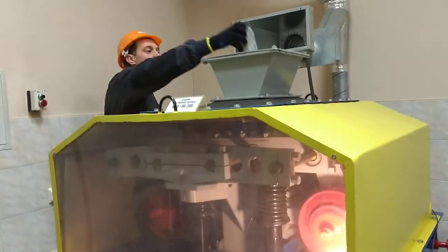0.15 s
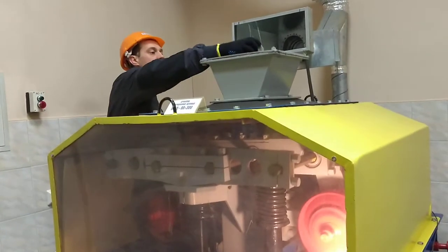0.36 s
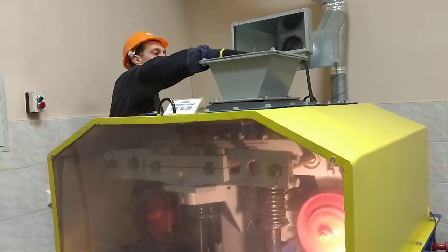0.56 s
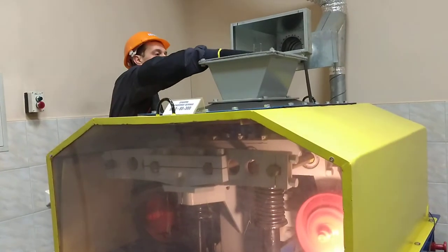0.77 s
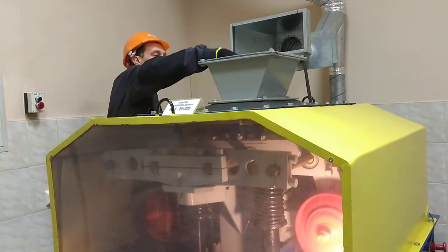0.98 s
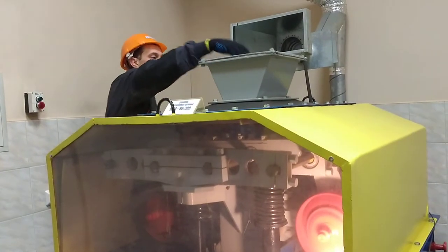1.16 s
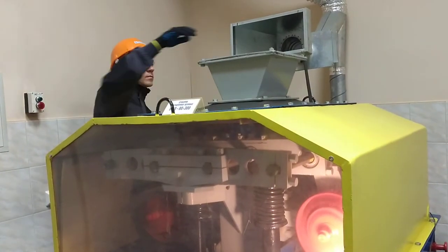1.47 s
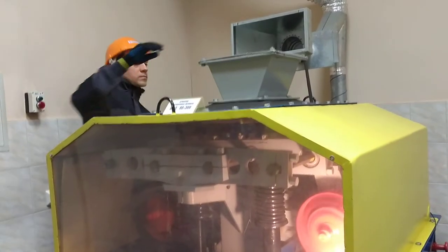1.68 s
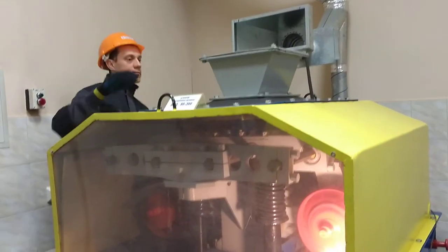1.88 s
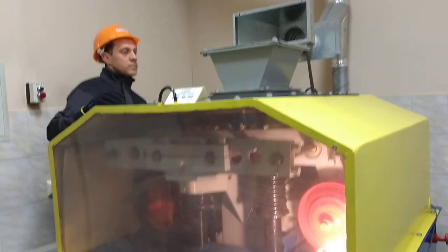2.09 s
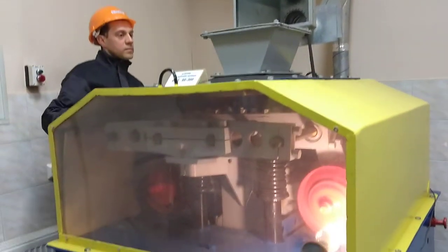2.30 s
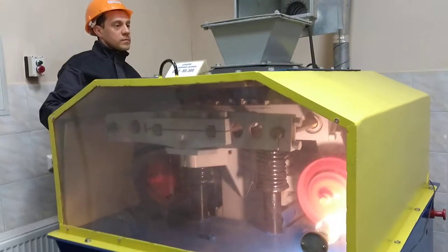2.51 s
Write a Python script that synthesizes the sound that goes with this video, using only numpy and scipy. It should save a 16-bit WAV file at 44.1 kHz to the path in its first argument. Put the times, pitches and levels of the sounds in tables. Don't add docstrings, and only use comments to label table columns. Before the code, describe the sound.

A jaw crusher runs loudly throughout, a deep shuddering roar with rattling steel casing, tonal hum and airy fan hiss. Around 1.1-1.3 s a stone clatters down the hollow metal hopper with quick knocks, thuds and a gritty scrape; the microphone level dips, then recovers. From 1.75 s jaws crunch, sharpest cracks until 2.05 s, with rumble heaving at 1.8 and 2.4 s. Short tiled-room echo, wide stereo.

```python
import sys
import numpy as np
from scipy import signal
from scipy.fft import rfft, irfft, next_fast_len
from scipy.io import wavfile
from scipy.ndimage import uniform_filter1d, map_coordinates

SR = 44100
rng = np.random.default_rng(int(sys.argv[2]) if len(sys.argv) > 2 else 0)


def persist_wave(psi):
    counts = np.round(np.clip(psi, -1, 1) * 32767).astype(np.int16)
    wavfile.write(sys.argv[1], SR, np.atleast_2d(counts).T)


def amplitude_ratio(level_db):
    exponent = np.asarray(level_db, float) / 20
    return 10 ** exponent


N = 116865
TIME_S = np.arange(N) / SR
HALVES = np.array([[.5], [-.5]])


def unit(x):
    return x / np.sqrt(np.mean(x ** 2) + 1e-20)


def along(points, hz):
    f, v = np.transpose(points)
    return np.interp(np.log(hz + 1), np.log(f + 1), v)


def curve(rows):
    return np.interp(TIME_S, *np.transpose(rows))


def wobble(rate):
    knots = rng.standard_normal(int(N * rate / SR) + 4)
    return map_coordinates(knots, [np.arange(N) * rate / SR])


def filtered(x, response):
    m = next_fast_len(N + SR // 2)
    return irfft(rfft(x, m) * response(np.fft.rfftfreq(m, 1 / SR)), m)[..., :N]


def resonances(table):
    def response(f):
        total = 0
        for k, (c, w, db) in enumerate(table):
            total = total + (-1) ** k * amplitude_ratio(db) * 1j * f * w / (c * c - f * f + 1j * f * w)
        return total
    return response


def noise(patchy_db):
    z = signal.stft(rng.standard_normal((2, N)), nperseg=512)[2]
    field = uniform_filter1d(rng.standard_normal(z.shape[1:]), 6, 0)
    field = uniform_filter1d(field, 10, 1)
    patchy = signal.istft(z * amplitude_ratio(patchy_db * unit(field)), nperseg=512)[1][:, :N]
    return unit(patchy) * np.sqrt(SR / 2)


def clicks(per_s, scatter_db):
    hits = rng.random((2, N)) < per_s / SR
    size = amplitude_ratio(scatter_db * rng.exponential(size=(2, N)))
    return unit(hits * size * rng.choice([-1, 1], (2, N)))


SHAFT_HZ = 24.9
WEAK_ORDERS_DB, WEAK_SCATTER_DB = 8.5, 6
UNSTEADY_DB, SPREAD_RAD = 1.65, 1.9
LOAD_DAMPS_DB, DAMPED_FROM_HZ = 14, 500
HUM_ORDER, HUM_HZ, HUM_DB, HUM_IN_STEP_S = 12, 300, -33, .17
# multiple, level_db, left_over_right_db, left_leads_rad
STRONG_ORDERS = [(2, -37.9, 0.2, 0.09), (3, -19.9, 0.3, -0.01), (4, -36.5, 0.6, 0.04),
                 (7, -39.5, -0.8, 0.09), (8, -40.8, 2.0, -0.01), (10, -39.9, -0.2, -0.13),
                 (12, -29.4, -1.5, 0.27), (13, -35.9, 0.5, 0.2), (14, -32.6, -1.0, 0.16),
                 (15, -36.2, -0.2, -0.05), (16, -32.1, -3.0, 0.52), (19, -34.2, -3.7, 0.68),
                 (20, -38.1, -2.1, 0.76), (21, -41.9, -1.5, 0.22), (22, -37, -1, 0.2),
                 (25, -40.6, -2.0, 0.39), (27, -37.5, 1.6, 0.31), (28, -27.9, 0.5, 0.36),
                 (29, -35.5, -1.7, 0.01), (32, -33.2, 0.4, 0.12), (33, -43.0, -10.5, 1.34),
                 (34, -43.5, -13.5, -2.07), (35, -44.8, -6.1, -0.07), (37, -44.8, -2.6, -0.13),
                 (39, -49.0, 2.1, 0.25), (43, -46.4, 8.1, -1.06), (49, -36.4, 3.3, -2.57),
                 (51, -40.9, -5.6, 2.12), (55, -43.7, 9.4, 1.58), (70, -36.4, 3.1, 1.67),
                 (73, -43.0, 7.2, 3.04), (140, -52, 0, 0)]
# pitch_hz, level_db_per_hz
ROAR_SHARED = [(35, -60), (90, -57), (200, -55.5), (450, -54), (750, -59), (1100, -71), (2000, -67.5),
               (4000, -76)]
# time_s, load_share
LOAD = [
    (0, 0.024),
    (1.15, 0.063),
    (1.3, 0.066),
    (1.7, 0.27),
    (1.8, 0.65),
    (1.97, 1.1),
    (2.1, 0.69),
    (2.4, 0.95),
    (2.65, 0.61),
]


def shafts():
    strong = {int(k): rest for k, *rest in STRONG_ORDERS}
    turn = 2 * np.pi * SHAFT_HZ * TIME_S
    load = np.clip(2 * curve(LOAD), 0, 1)
    out = np.zeros((2, N))
    for k, (size, start, lag) in enumerate(rng.standard_normal((142, 3)), 1):
        hz = k * SHAFT_HZ
        weak_db = along(ROAR_SHARED, hz) + WEAK_ORDERS_DB + WEAK_SCATTER_DB * size
        weak_lead = lag * SPREAD_RAD * min(hz / 1100, 1.5) ** 2
        db, pan, lead = strong.get(k, (weak_db, 0, weak_lead))
        high = hz ** 2 / (hz ** 2 + DAMPED_FROM_HZ ** 2)
        level = amplitude_ratio(db + high * (UNSTEADY_DB * wobble(7.18) - LOAD_DAMPS_DB * load))
        phase = k * turn + 10 * start + HALVES * lead
        out += np.sqrt(2) * level * amplitude_ratio(pan * HALVES) * np.sin(phase)
        if k == HUM_ORDER:
            drift = 2 * np.pi * (HUM_HZ - hz) * (TIME_S - HUM_IN_STEP_S)
            out += np.sqrt(2) * amplitude_ratio(HUM_DB + pan * HALVES) * np.sin(phase + drift)
    return out


# pitch_hz, width_hz, level_db
CASING = [(218, 11.5, 12), (319.6, 21, 11.5), (406.2, 13, 9), (435, 11, 7), (549, 26, 4), (686, 58, 4),
          (1207, 210, 9), (1750, 150, 4), (3400, 48, 4)]


def casing(hz):
    return amplitude_ratio(sum(db / (1 + (2 * (hz - c) / w) ** 2) for c, w, db in CASING))


SHAKE_DEPTH = 0.075
LOAD_MUFFLES_DB, MUFFLED_HZ, MUFFLED_WIDE_HZ = -1.5, 595, 507
# pitch_hz, level_db_per_hz
ROAR_DIFFERENT = [(35, -94), (130, -80), (450, -62), (750, -70.5), (1100, -68), (1500, -61), (2200, -73),
                  (4000, -73.5)]


def casing_roar():
    shake = amplitude_ratio(0.58 * wobble(3.92) + 1.45 * wobble(14))
    shake = shake * (1 + SHAKE_DEPTH * np.sin(2 * np.pi * SHAFT_HZ * TIME_S))

    def colour(hz):
        levels = amplitude_ratio([along(ROAR_SHARED, hz), along(ROAR_DIFFERENT, hz)])
        return casing(hz) * levels / (1 + (hz / 5000) ** 2)

    def muffled_band(hz):
        return 1 / (1 + (2 * (hz - MUFFLED_HZ) / MUFFLED_WIDE_HZ) ** 4)

    mid, side = filtered(noise(patchy_db=0.5) * shake, colour)
    lost = 1 - amplitude_ratio(-LOAD_MUFFLES_DB * curve(LOAD))
    mid = mid - lost * filtered(mid, muffled_band)
    return np.array([mid + side, mid - side])


# pitch_hz, level_db_per_hz
FAN = [(1000, -84), (3000, -84), (6000, -76.5), (9000, -75), (11500, -72.5), (14000, -79), (16000, -106)]
# time_s, level_db
DUST = [(0, 0), (1.2, -1), (1.3, -1.5), (1.68, -3), (1.85, -3.5), (2.3, -2), (2.42, -0.5), (2.65, -4.5)]


def fan_hiss():
    flutter = amplitude_ratio(curve(DUST) + 0.6 * wobble(9.85))
    return filtered(noise(patchy_db=2.0) * flutter, lambda hz: amplitude_ratio(along(FAN, hz)))


# pitch_hz, level_db
RUMBLE = [(80, -40), (130, -7), (220, 2), (330, -4.5), (500, -31), (900, -39)]
# time_s, length_s, level_db
HEAVES = [
    (1.824, 0.027, 8.5),
    (2.01, 0.034, 1),
    (2.378, 0.086, 8.5),
]
LOAD_RUMBLE_DB = -27.5


def load_rumble():
    heave_db = sum(db * np.exp(-((TIME_S - s) / lasts) ** 2) for s, lasts, db in HEAVES)
    low = unit(filtered(noise(patchy_db=0.0), lambda hz: amplitude_ratio(along(RUMBLE, hz))))
    level = amplitude_ratio(LOAD_RUMBLE_DB + heave_db + 1.9 * wobble(5.72)) * curve(LOAD) ** 2
    return level * (low[0] + 0.24 * low[1] * [[1], [-1]])


def struck(hits, body):
    pulses, one = np.zeros(N), np.zeros(N)
    one[0] = 1
    for s, db in hits:
        pulses[round(s * SR)] = amplitude_ratio(db)
    ring_peak = np.abs(filtered(one, resonances(body))).max()
    return filtered(pulses, resonances(body)) / ring_peak


def rattled(hits, level_rows, body):
    level = amplitude_ratio(curve(level_rows))
    return unit(filtered(hits * level, resonances(body))) * np.sqrt(np.mean(level ** 2))


# time_s, level_db
TUMBLE = [(1.11, -34), (1.123, -19), (1.14, -21.5), (1.165, -15), (1.189, -16.5), (1.215, -22), (1.23, -28),
          (1.25, -35.5)]
# time_s, level_db
THUD = [(1.1, -29.5), (1.13, -19), (1.18, -13), (1.22, -14), (1.27, -25), (1.3, -20), (1.36, -19),
        (1.5, -23), (1.6, -39)]
# time_s, level_db
SCRAPE = [(1.13, -58), (1.15, -33), (1.165, -20.5), (1.185, -21), (1.2, -36), (1.24, -32), (1.3, -46)]
# start_s, peak_db
BLOWS = [(1.124, -7), (1.1364, -8), (1.1501, -6), (1.157, -5), (1.1666, -5), (1.1763, -6), (1.1831, -5),
         (1.19, -7), (1.1955, -7), (1.2038, -8), (1.2162, -9), (1.2327, -11)]
# start_s, peak_db
DROPS = [
    (1.178, -8),
    (1.195, -7),
    (1.2241, -6),
    (1.2314, -10),
    (1.246, -9),
    (1.2629, -7),
    (1.2872, -7),
    (1.326, -11),
]
# pitch_hz, width_hz, level_db
HOPPER = [(204, 41, 2), (550, 30, -2), (636, 51, -1), (727, 26.5, 6.5), (840, 41, -9.5), (911, 52, -3),
          (1034, 39, -3), (1113, 60, -8.5), (1490, 62, -16.5)]
# pitch_hz, width_hz, level_db
CHUTE = [(333, 32, 0), (365, 60, -1.5), (412, 40, 3), (485, 50, -2.5), (552, 53, -2.5)]
# pitch_hz, width_hz, level_db
GRIT = [(2180, 830, 9), (2870, 1400, 6), (3450, 250, 4.5), (4300, 320, -14), (5300, 840, -6)]


def stone():
    hopper_hits, chute_hits = clicks(760, scatter_db=1.5)
    knocks = rattled(hopper_hits, TUMBLE, HOPPER) + struck(BLOWS, HOPPER)
    thuds = rattled(chute_hits, THUD, CHUTE) + struck(DROPS, CHUTE)
    grit = unit(filtered(clicks(910, scatter_db=1), resonances(GRIT))) * amplitude_ratio(curve(SCRAPE))
    return knocks + thuds + grit


CRUNCH_PER_S, CRUNCH_HZ, CRUNCH_WIDE_HZ = 2700, 2520, 2330
# time_s, level_db
CRUNCH = [(1.745, -60), (1.765, -34.5), (1.88, -33.5), (1.93, -39.5), (1.97, -32), (2.03, -41.5),
          (2.2, -43.5), (2.4, -37), (2.65, -40.5)]
# start_s, peak_db
CRACKS = [
    (1.7634, -22),
    (1.8294, -10.5),
    (1.9364, -9.5),
    (1.9664, -25),
    (1.9774, -7),
    (2.0044, -13),
    (2.0524, -12),
    (2.2574, -29),
    (2.5974, -30),
    (2.6239, -32),
]


def crunch():
    grains = clicks(CRUNCH_PER_S, scatter_db=1.5) * amplitude_ratio(curve(CRUNCH) + 0.57 * wobble(11))
    for s, db in CRACKS:
        grains[:, round(s * SR)] += amplitude_ratio(db - 1.5)
    breaking = resonances([(CRUNCH_HZ, CRUNCH_WIDE_HZ, 0)])
    return filtered(grains, lambda hz: 3 * casing(hz) * breaking(hz))


# pitch_hz, fade_s
ROOM = [(200, 0.25), (1000, 0.37), (10000, 0.14)]


def room(x):
    hz, t, z = signal.stft(rng.standard_normal((2, SR // 2)), SR, nperseg=256)
    fade = amplitude_ratio(-60 * t / along(ROOM, hz)[:, None])
    tail = signal.istft(z * fade, SR, nperseg=256)[1]
    delayed = np.pad(x, ((0, 0), (300, 0)))
    return signal.fftconvolve(delayed, tail / np.linalg.norm(tail[0]), axes=1)[:, :N]


def scene():
    machine = shafts() + casing_roar() + fan_hiss() + load_rumble()
    near = stone() + crunch()
    return machine + near + amplitude_ratio(-6.5) * room(near)


def top_cut(x):
    return signal.sosfilt(signal.butter(12, 14450, fs=SR, output="sos"), x)


# time_s, level_db
GAIN = [(0, -0.5), (.8, 0), (1.12, 0.5), (1.17, -4), (1.22, -7), (1.29, -8.5), (1.45, -6), (1.7, -2),
        (2.1, 1.5), (2.45, 1), (2.65, 4)]
# pitch_hz, left_over_right_db
PORT_TILT = [(1500, 0), (5500, -8), (7200, -7), (9500, -2.5), (12500, -11), (14500, -2)]
# pitch_hz, share_into_left, share_into_right
CROSS = [(100, .92, .93), (1500, .88, .95), (3500, .78, .92), (4700, .76, .9), (5900, .56, .78),
         (7200, .46, .6), (9500, .32, .3), (12000, .26, .16)]
CROSS_DELAY_S, CROSS_WANDERS, WANDER_FROM_HZ = .000419, .47, 4500
LIMIT, TOP_HZ = .93, 14370


def record(dry):
    ports = filtered(dry * amplitude_ratio(curve(GAIN)), lambda hz: amplitude_ratio(along(PORT_TILT, hz) * HALVES))

    def feed(hz):
        into_left = along([(f, left) for f, left, right in CROSS], hz)
        into_right = along([(f, right) for f, left, right in CROSS], hz)
        return np.array([into_left, into_right]) * np.exp(-2j * np.pi * hz * CROSS_DELAY_S)

    across = filtered(ports[::-1], feed)
    treble = filtered(across, lambda hz: hz ** 4 / (hz ** 4 + WANDER_FROM_HZ ** 4))
    wide = ports - across - CROSS_WANDERS * wobble(9.13) * treble
    limited = wide / (1 + np.abs(wide / LIMIT) ** 8) ** (1 / 8)
    mix = filtered(limited, lambda hz: hz < TOP_HZ)
    return top_cut(mix)


dry = scene()
out = record(dry)
persist_wave(out)
```